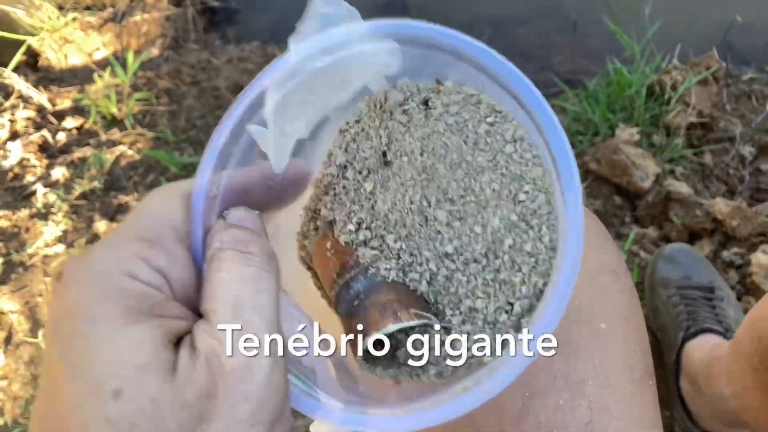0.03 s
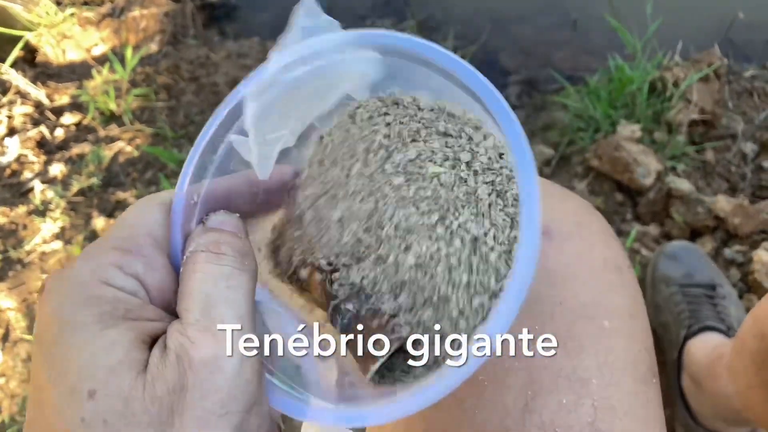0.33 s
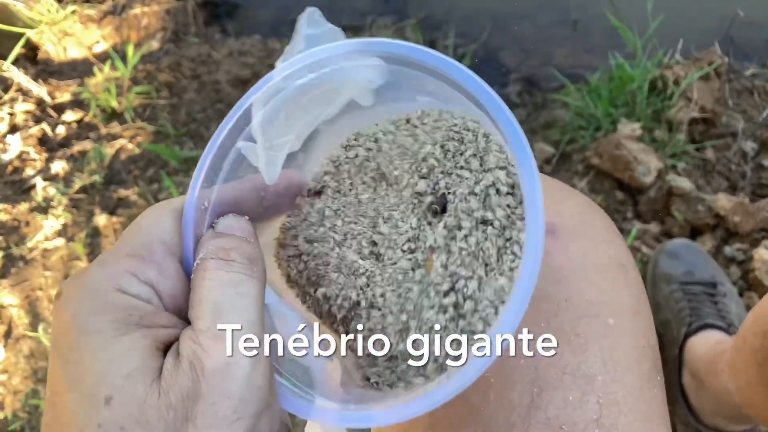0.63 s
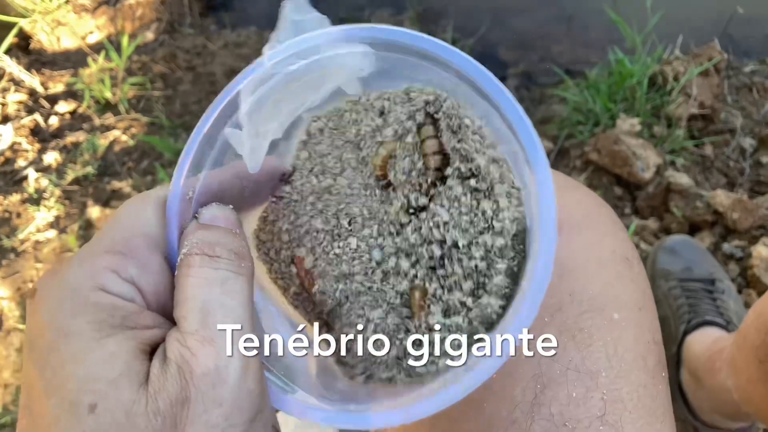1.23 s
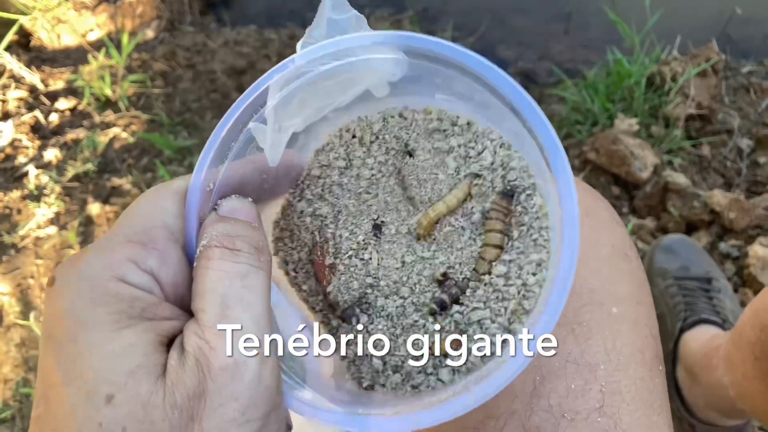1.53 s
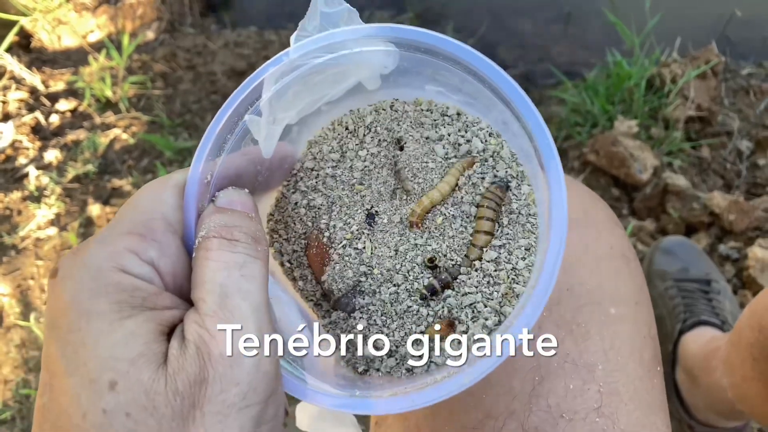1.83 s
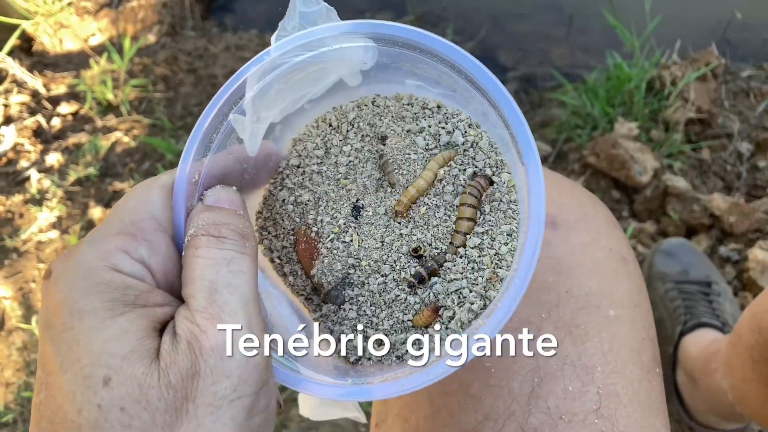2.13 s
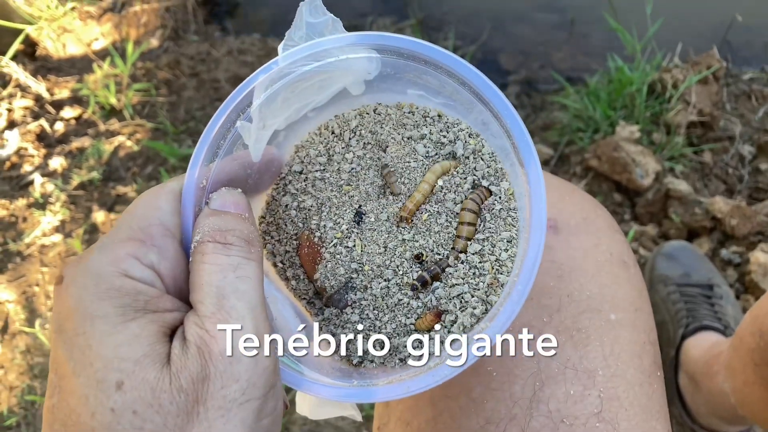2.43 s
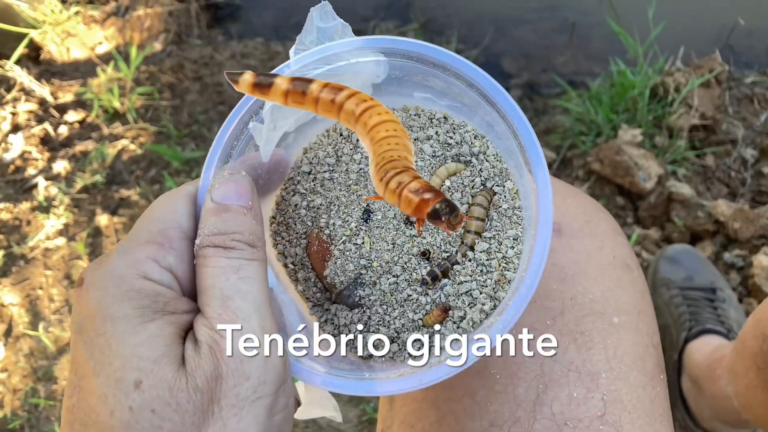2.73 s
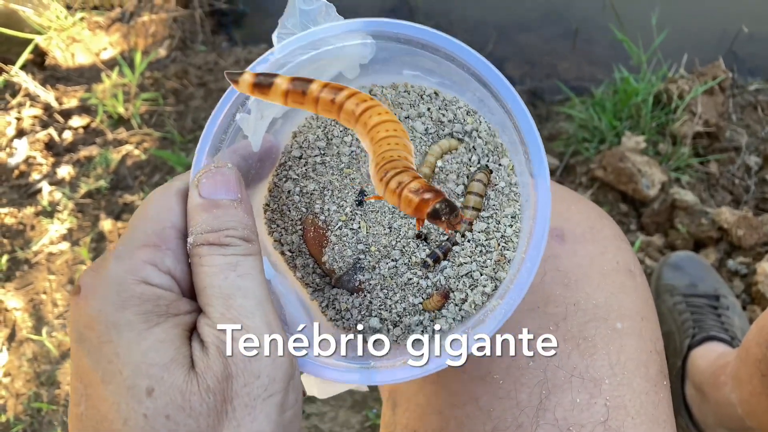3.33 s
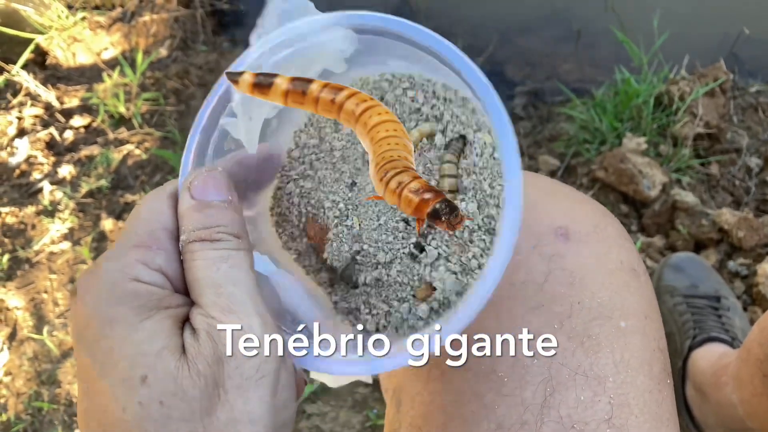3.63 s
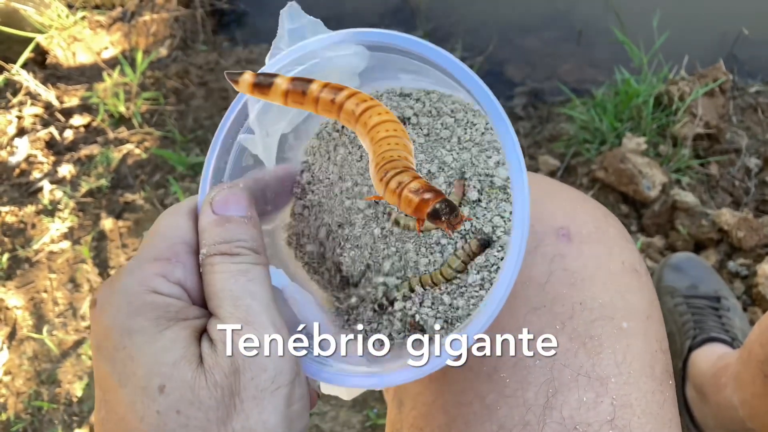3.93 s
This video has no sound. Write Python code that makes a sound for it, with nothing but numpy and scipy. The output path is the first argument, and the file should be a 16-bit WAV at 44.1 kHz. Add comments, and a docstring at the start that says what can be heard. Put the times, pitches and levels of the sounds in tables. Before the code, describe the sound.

Dry grains rustle and slide in a plastic tub shaken by hand outdoors.

```python
"""Dry flakes rustle and slide in a thin plastic tub, shaken in one hand close to a stereo microphone.
They move in three bouts, with a faint stir before the last: grain rubs on grain and scrapes the tub.
Lumps tick on the plastic, the tub knocks hollowly as it flexes, and the heap lands with dull thuds.
The place is outdoors: quiet open air lies behind, with a thin band of insects far off."""
import sys
import numpy as np
from scipy import signal
from scipy.fft import rfft, irfft, next_fast_len
from scipy.io import wavfile
from scipy.ndimage import uniform_filter1d, map_coordinates

SR = 44100
rng = np.random.default_rng(int(sys.argv[2]) if len(sys.argv) > 2 else 0)


def dump_mix(stems):
    """Bounce the given channels to the path in sys.argv[1] as a 16-bit WAV at rate SR."""
    frames = np.atleast_2d(stems).T  # one column per channel
    limited = np.clip(frames, -1, 1)  # hard clip at full scale
    pcm = np.round(limited * 32767).astype(np.int16)
    wavfile.write(sys.argv[1], SR, pcm)


N = 176400

# Flow of the sliding grains, one list a movement: time_s, level_db
GRAIN_FLOW = [
    [(0.0, -76), (0.066, -51.5), (0.082, -56.5), (0.134, -46), (0.184, -56.5), (0.218, -44), (0.418, -44),
     (0.484, -39.5), (0.586, -44), (0.608, -41), (0.674, -52), (0.684, -42.5), (0.81, -64), (0.87, -66.5)],
    [(1.028, -72.5), (1.104, -48), (1.114, -54), (1.232, -47), (1.248, -45), (1.272, -51), (1.304, -42),
     (1.346, -46.5), (1.358, -42.5), (1.384, -47), (1.514, -49), (1.57, -69.5), (1.7, -83)],
    [(2.48, -93), (2.553, -56.5), (2.61, -83.5), (2.688, -63), (2.73, -78), (2.788, -77.5), (2.812, -66.5),
     (2.9, -91.5)],
    [(3.44, -81), (3.5, -72.5), (3.54, -58), (3.604, -60.5), (3.626, -56.5), (3.648, -62), (3.676, -46.5),
     (3.84, -47.5), (3.866, -54.5), (3.88, -48), (3.922, -64.5), (3.93, -51.5), (4.0, -81)],
]
# Grain rubbing on grain: frequency_hz, level_db
RUSTLE_SPECTRUM = [(200, -26.5), (1200, -11), (2000, 1), (2500, -2), (3200, 0.5), (4000, -1.5), (4800, 1),
                   (6500, 0.5), (8300, -0.5), (10500, 0.5), (13000, -3.5), (14300, -14), (16000, -3.5)]
# The tub's answer to scraping grains: frequency_hz, level_db
SCRAPE_SPECTRUM = [(30, -23.5), (110, -13.5), (300, -2), (415, 6.5), (590, -1.5), (850, 7.5), (1150, 1),
                   (1500, 3), (2150, -6.5), (2600, -30), (5000, -9)]
# How hard the load bears on the plastic: time_s, scrape_gain_db
LOAD_BEARING = [(.1, -1), (.25, 4), (.45, 7), (.68, -1.5), (.8, 7.5), (1.2, 3), (1.35, -0.5), (1.5, 0.5),
                (3.55, 9.5), (3.8, -1), (3.88, -13)]
# Lumps striking the plastic: start_s, tick_level_db, tap_level_db
LUMP_HITS = [(0.0638, -31.5, -52), (0.0752, -34.5, -56), (0.2997, -22.5, -44), (0.399, -34, -33.5),
             (.483, -24.5, -35), (0.5072, -30.5, -29), (0.6864, -27, -74), (0.7395, -34, -44),
             (.8355, -50, -48.5), (.860, -59, -46.5), (0.9665, -33, -61), (1.0997, -29.5, -42.5),
             (1.246, -21, -46.5), (1.2875, -31, -63.5), (1.3558, -18.5, -41), (1.3846, -40, -43.5),
             (1.547, -41, -57), (1.571, -54, -50), (1.811, -49, -74), (2.5505, -32, -47.5),
             (3.681, -45, -32), (3.8755, -26, -81), (3.929, -43, -66)]
# Colour of a lump's tick: frequency_hz, gain_db
TICK_SPECTRUM = [(300, -24.5), (1500, 6.5), (4000, -8.5), (6500, 7), (11500, 11), (16000, -6.5)]
# The tub's modes under a lump: pitch_hz, gain_db, t60_s
TUB_MODES = [(426.6, -1.5, 0.038), (860, -1, .014), (1376, 1, .015), (1750, -4, 0.0084)]
# Knocks of the flexing tub: start_s, base_pitch_hz, base_gain_db, wall_gain_db, thump_gain_db
FLEX_KNOCKS = [(.1540, 345, 13, -5.5, 8), (0.2143, 380, 6, 17, 5), (0.2996, 305, 3, -2, 0),
               (.3110, 379, 6, 5.5, 3), (0.381, 370, 12.5, 14, 2), (0.466, 380, 8, 8, 5),
               (1.0840, 358, 19, -1.5, 13.5), (2.5357, 248, -13.5, -27, 1), (2.6841, 407, 15, -5, 1),
               (3.4743, 407, 7, -5.5, -1.5), (3.5225, 407, 22, 0, 2), (3.6392, 418, 4.5, -17, -2),
               (3.6765, 397, 22, 4, 7), (3.7054, 366, 16, 7.5, 4), (3.7332, 374, 14.5, -3, 5)]
# The heap landing against the side: start_s, level_db
HEAP_LANDINGS = [(0.225, -38.5), (0.261, -46), (0.321, -49), (.389, -38), (0.478, -45)]
# Phase of the tub between the microphone's two ports: frequency_hz, left_lead_rad
MIC_PHASE = [(0, 0), (900, .7), (1500, .6), (2400, 2.9), (3200, -.8), (4400, -1), (5200, -2.6),
             (6300, -6.2), (7300, -6.4), (9100, -9.4), (11300, -12.5), (13600, -15.7), (15600, -18.9)]
# Likeness of the grain noise at the two ports: frequency_hz, correlation
MIC_LIKENESS = [(100, .9), (500, .8), (1100, .55), (1700, .85), (3000, .4), (5000, .4), (6500, .9),
                (15000, .88)]
# Balance of the tub between the two ports: frequency_hz, left_minus_right_db
MIC_BALANCE = [(100, 3), (350, 0.6), (700, 4.5), (1200, 4), (2000, -0.5), (4800, 2.5), (7000, -0.5)]
# Colour of the open air: frequency_hz, level_db
AIR_SPECTRUM = [(20, -33), (53, -9), (227, -9), (305, -2.5), (509, -13), (900, -8.5), (1500, -20.5),
                (2100, -20.5), (5010, -39), (6730, -33.5), (9000, -48), (15500, -43.5)]
# Slow swell of the air: time_s, level_db
AIR_SWELL = [(1.65, -70.5), (2.068, -67), (2.866, -71), (3.44, -66)]
# Likeness of the air left and right: frequency_hz, correlation
AIR_LIKENESS = [(50, 0.9), (300, 0.61), (1200, 0.033)]

FULL_FLOW_DB, GRAINS_PER_S = -45.5, 5500  # full flow, and the impact rate there
RUSTLE_DB, FLAKE_DB, WALL_RING_DB, SCRAPE_DB = 0.5, -4.5, -15, -9
TUB_TREBLE_HZ = 1320  # taps tilt about this point; knocks roll off near it


def sliding_grains():
    """More flow means more and louder grains; they move in clumps, scrape the tub and ring its wall."""
    ring_hz, ring_width_hz = 4280, 220
    flow_db = curve([row for movement in GRAIN_FLOW for row in movement])
    above_full_db = flow_db - FULL_FLOW_DB
    rate = GRAINS_PER_S * amp(0.6 * above_full_db)
    clumps_db = 1.5 * wobble(170)
    fine = coloured(patchy_colour(grain_impacts(rate)), RUSTLE_SPECTRUM, MIC_LIKENESS)
    coarse = coloured(patchy_colour(np.array([flakes(), flakes()])), RUSTLE_SPECTRUM, MIC_LIKENESS)
    ring = unit(filtered(grain_impacts(rate), lambda hz: (1 + 2j * (hz - ring_hz) / ring_width_hz) ** -2))
    rustle = amp(RUSTLE_DB) * fine + amp(FLAKE_DB) * coarse + amp(WALL_RING_DB) * ring
    scrape_db = FULL_FLOW_DB + 0.9 * above_full_db + SCRAPE_DB + curve(LOAD_BEARING) + 2 * wobble(90)
    scrape = coloured(grain_impacts(rate), SCRAPE_SPECTRUM, MIC_LIKENESS)
    return rustle * amp(flow_db + clumps_db) + scrape * amp(scrape_db)


def grain_impacts(per_s, spread_db=3):
    """Fine grains collide: two trains of tiny impacts of uneven size, with steady power at any rate."""
    chance = np.clip(per_s / SR, 1e-4, 1)
    size = amp(np.clip(rng.standard_normal((2, N)), -3, 2.5) * spread_db)
    sign = rng.choice([-1, 1], (2, N))
    hits = rng.random((2, N)) < chance
    return unit(hits * size * sign / np.sqrt(chance))


def flakes(per_s=2200, decay_cycles=7.4, spread_db=4.5):
    """Coarse flakes collide at random, each ringing for a few cycles at its own pitch."""
    when, pitch, strength = np.hsplit(rng.random((int(per_s * N / SR), 3)), 3)
    start = (when * N).astype(int)
    hz = 1200 + 14500 * pitch ** 1.3
    size = amp(spread_db * np.minimum(-np.log(1 - strength), 3))
    age = np.arange(256)
    cycles = hz * age / SR
    decay = np.exp(-cycles / decay_cycles) * (1 - age / len(age))
    rings = size * np.sqrt(hz) * np.sin(2 * np.pi * cycles) * decay
    return unit(np.bincount((start + age).ravel(), rings.ravel(), N)[:N])


def patchy_colour(grains, depth_db=2.2):
    """Random gains, a few hundred Hz wide and some 20 ms long, give the rustle a flickering colour."""
    spectra = signal.stft(grains, nperseg=512)[2]
    patches = rng.standard_normal(spectra.shape[1:])
    for axis in (0, 1):
        patches = uniform_filter1d(patches, size=4, axis=axis)
    return unit(signal.istft(spectra * amp(depth_db * unit(patches)))[1][:, :N])


def lump_ticks():
    """A lump hits the plastic: a snap, a bright crack, a hollow tap and a brief spill of grains."""
    snap_gain_db, burst_gain_db, big_lump_db, light_tap_db = -8, -7.5, -20.5, -54
    crack_t60_s, spill_t60_s, detune = 0.0052, 0.067, 0.025
    t = np.arange(SR // 10) / SR
    snaps, burst_envelope, taps = np.zeros((3, N + SR))
    for start_s, tick_db, tap_db in LUMP_HITS:
        at = round(start_s * SR)
        snaps[at] = amp(tick_db + snap_gain_db)
        crack = amp(-60 * t / crack_t60_s)
        spill_db = tick_db - big_lump_db - 11  # bigger lumps shake more grains loose
        spill = amp(spill_db - 60 * t / spill_t60_s)
        burst_envelope[at:][:len(t)] += amp(tick_db + burst_gain_db) * (crack + spill)
        for hz, mode_db, t60_s in TUB_MODES:
            tilt_db = 0.2 * (tap_db - light_tap_db) * np.log2(hz / TUB_TREBLE_HZ)  # harder is brighter
            ring = rng.choice([-1, 1]) * np.sin(2 * np.pi * hz * (1 + detune * rng.standard_normal()) * t)
            taps[at:][:len(t)] += amp(tap_db + mode_db + tilt_db - 60 * t / t60_s) * ring
    snap = filtered(snaps[:N], lambda hz: amp(along(TICK_SPECTRUM, hz)))
    hiss = coloured(rng.standard_normal((2, N)), TICK_SPECTRUM, MIC_LIKENESS)
    return snap + burst_envelope[:N] * hiss + taps[:N]


def tub_knocks():
    """The loaded base, the wall and the whole tub answer a blow; thin plastic delivers the lows last."""
    wall_hz, thump_hz, uneven_step_hz = 841, 192, 98.4
    firm_db, firm_q, bend_delay_cycles = 10.5, 2.66, 0.82
    n = 8192
    hz = np.fft.rfftfreq(n, 1 / SR) + 1

    def band(centre_hz, octaves, q=0):
        """A bell in log frequency, sharpened into a resonance by q."""
        bell = np.exp(-.5 * (np.log2(hz / centre_hz) / octaves) ** 2)
        return bell / np.hypot(1, q * (hz / centre_hz - centre_hz / hz))

    wall = band(wall_hz, octaves=0.77, q=4.3)
    thump = band(thump_hz, octaves=0.66)
    out = np.zeros(N + SR)
    for start_s, base_hz, base_db, wall_db, thump_db in FLEX_KNOCKS:
        # A firm blow lifts the load off the base, which then rings longer.
        base = band(base_hz, octaves=0.53, q=firm_q * amp(0.5 * (base_db - firm_db)))
        gain = amp(base_db) * base + amp(wall_db) * wall + amp(thump_db) * thump
        # Soft blows, which barely stir the wall, lose their top.
        top_hz = TUB_TREBLE_HZ * 2 ** (0.022 * (wall_db - base_db))
        # The shifting load roughens the resonances.
        uneven_db = 2 * map_coordinates(rng.standard_normal(64), [hz / uneven_step_hz], mode="mirror")
        gain *= amp(uneven_db) / np.hypot(1, (hz / top_hz) ** 8)
        cepstrum = irfft(np.log(gain + gain.max() * amp(-50)))
        minimum_phase = 2 * rfft(cepstrum[:n // 2], n).imag
        # Bending waves bring each frequency equally many cycles late, so the knock falls in pitch.
        phase = minimum_phase - 2 * np.pi * bend_delay_cycles * np.log(hz / base_hz)
        out[round(start_s * SR):][:n // 2] += irfft(gain * np.exp(1j * phase))[:n // 2]
    return out[:N]


def heap_thuds(pitch_hz=107, rise_s=0.0043):
    """The heap lands softly and rocks the whole tub for two or three slow cycles."""
    t = np.arange(SR // 10) / SR
    rock = np.sin(2 * np.pi * pitch_hz * t) * t / rise_s * np.exp(1 - t / rise_s)
    out = np.zeros(N + SR)
    for start_s, level_db in HEAP_LANDINGS:
        out[round(start_s * SR):][:len(t)] += amp(level_db) * rock
    return out[:N]


def open_air(gain_db=3, left_right_db=(-1, 1)):
    """Quiet open air all round: a low, wavering wash that leans a little to the right."""
    wash = coloured(rng.standard_normal((2, N)), AIR_SPECTRUM, AIR_LIKENESS)
    level_db = curve(AIR_SWELL) + gain_db + wobble(15)
    return wash * amp(level_db) * amp(left_right_db)[:, None]


def distant_insects(centre_hz=6600, width_hz=830, level_db=-82.5):
    """Far insects blend into one steady, narrow band of hiss."""
    band = lambda hz: np.exp(-.5 * ((hz - centre_hz) / width_hz) ** 2)
    return amp(level_db) * unit(filtered(rng.standard_normal((2, N)), band))


def amp(db):
    """Decibels to gain."""
    return 10 ** (np.asarray(db) / 20)


def unit(x):
    """Scaled to rms 1."""
    return x / np.sqrt(np.mean(x ** 2) + 1e-20)


def along(points, hz):
    """Rows of frequency_hz, value read on a log axis."""
    knots_hz, values = np.transpose(points)
    return np.interp(np.log(hz + 1), np.log(knots_hz + 1), values)


def curve(rows):
    """Rows of time_s, value drawn out to one value a sample."""
    return np.interp(np.arange(N) / SR, *np.transpose(rows))


def wobble(knots_per_s):
    """A smooth random curve."""
    return map_coordinates(rng.standard_normal(2000), [np.arange(N) * knots_per_s / SR], mode="mirror")


def filtered(x, response):
    """x passed through a frequency response."""
    n = next_fast_len(N + SR // 4)
    return irfft(rfft(x, n) * response(np.fft.rfftfreq(n, 1 / SR)), n)[..., :N]


def coloured(pair, spectrum, likeness):
    """Two unrelated signals become a stereo pair of rms 1 with this spectrum and likeness."""
    angle = lambda hz: np.arccos(np.clip(along(likeness, hz), -1, 1)) / 2
    response = lambda hz: amp(along(spectrum, hz)) * [np.cos(angle(hz)), np.sin(angle(hz))]
    mid, side = filtered(pair, response)
    return unit(np.array([mid + side, mid - side]))


def mic_ports(hz):
    """Close sound reaches the microphone's two ports with different level and phase."""
    sides = np.array([[.5], [-.5]])
    lead_rad = np.interp(hz, *np.transpose(MIC_PHASE))
    return amp(sides * along(MIC_BALANCE, hz)) * np.exp(1j * sides * lead_rad)


def scene():
    """The tub close to the microphone, with open air and insects well behind it."""
    tub = sliding_grains() + lump_ticks() + tub_knocks() + heap_thuds()
    return filtered(tub, mic_ports) + open_air() + distant_insects()


def record(dry, top_hz=15850):
    """Nothing passes above the band limit."""
    return filtered(dry, lambda hz: hz < top_hz)


dry = scene()
out = record(dry)
dump_mix(out)
```